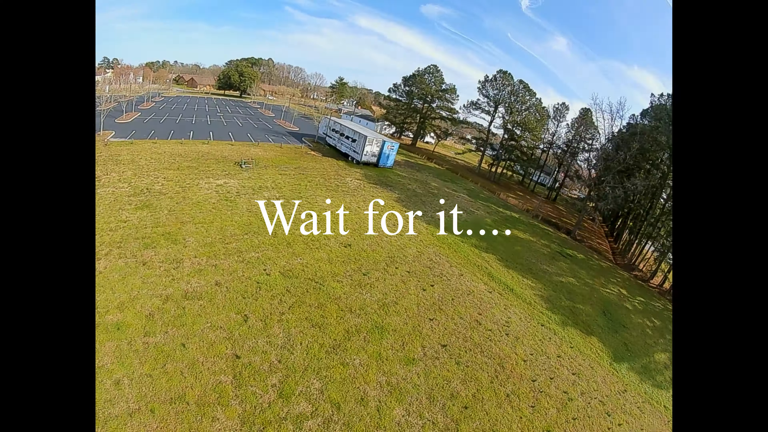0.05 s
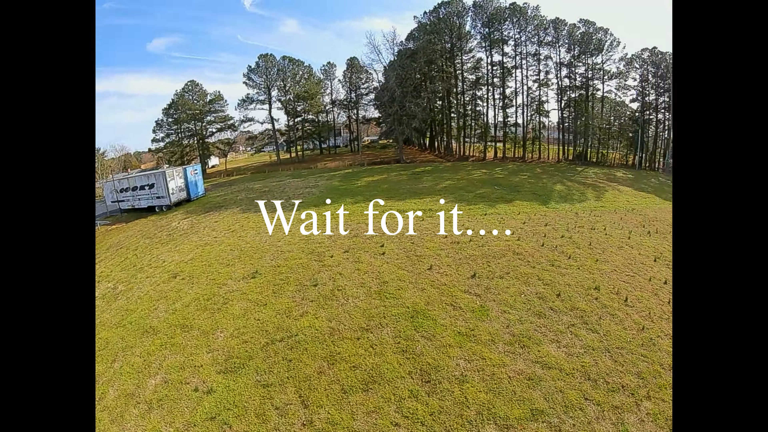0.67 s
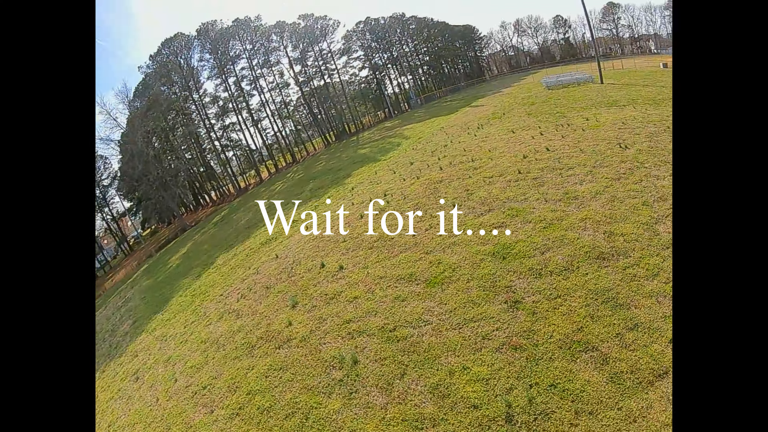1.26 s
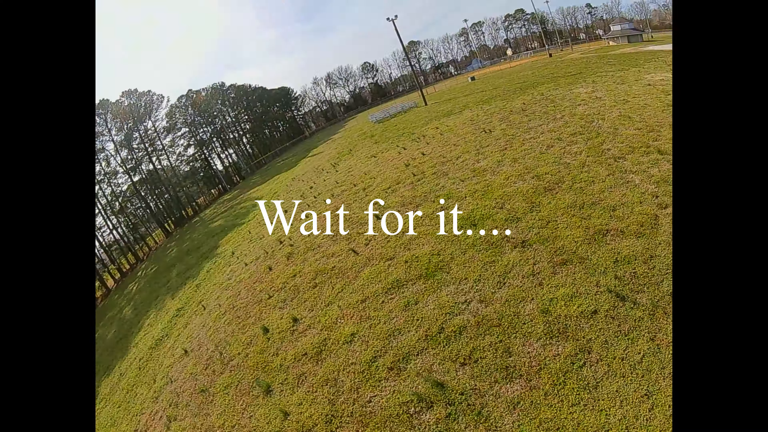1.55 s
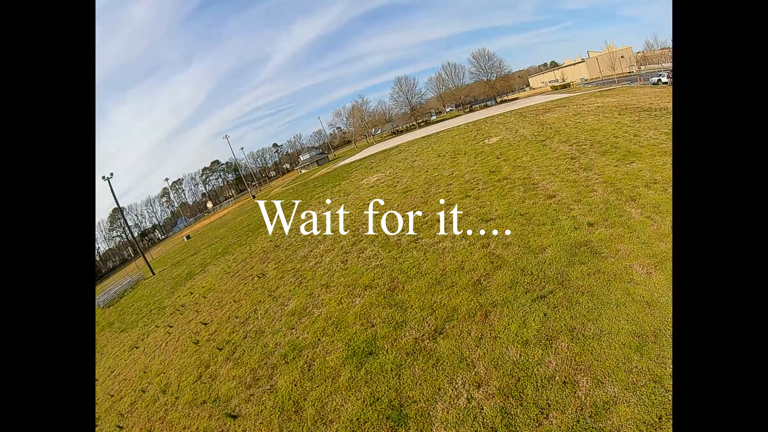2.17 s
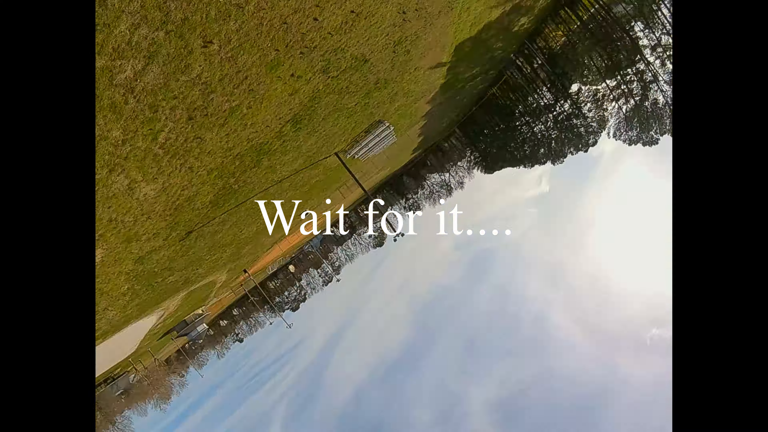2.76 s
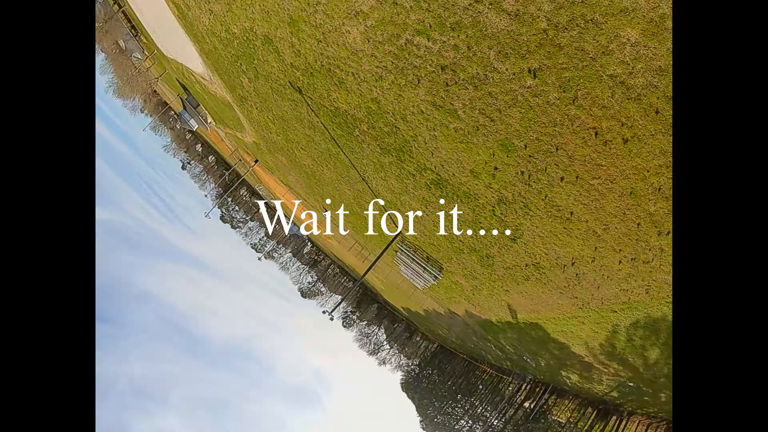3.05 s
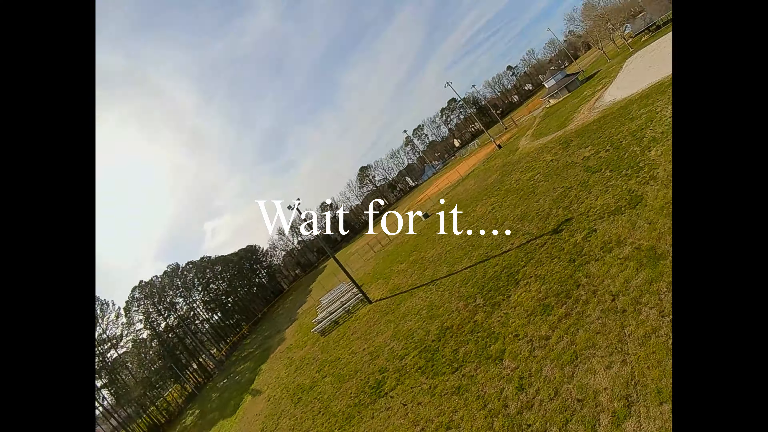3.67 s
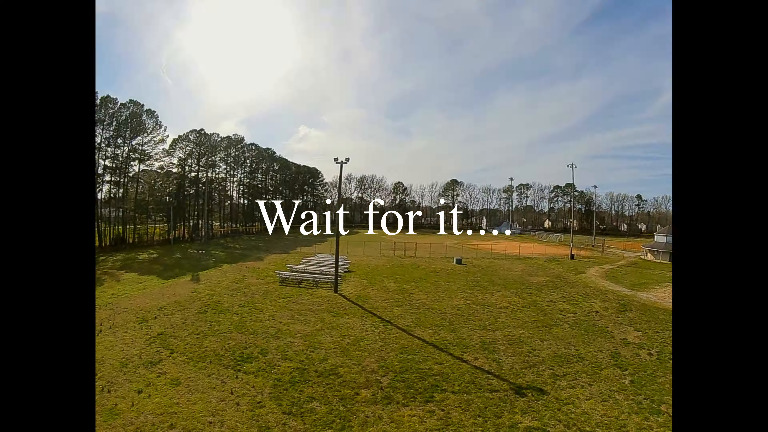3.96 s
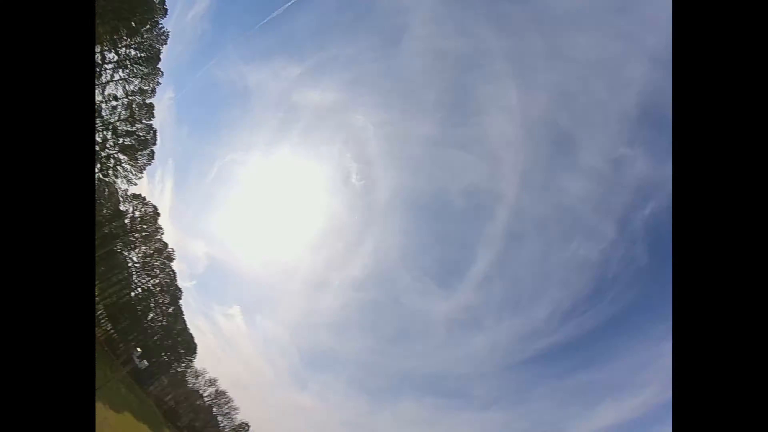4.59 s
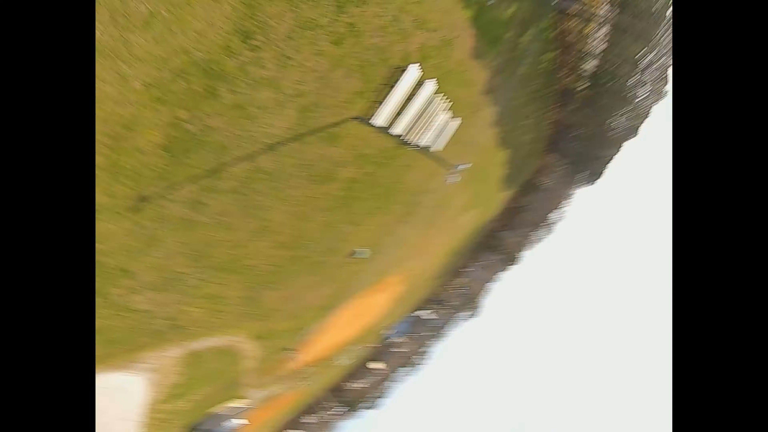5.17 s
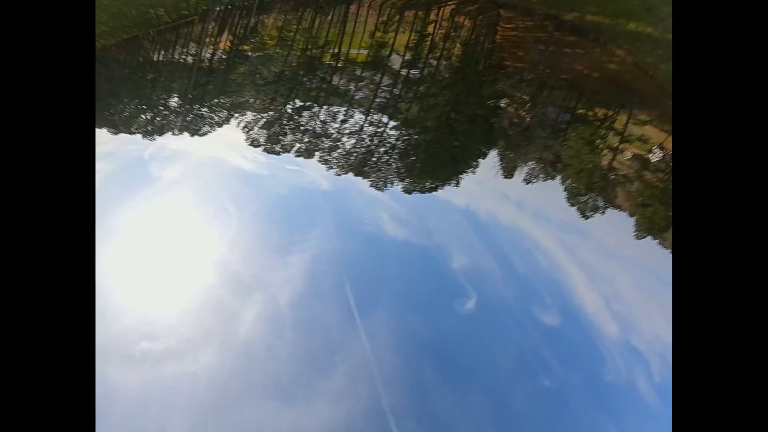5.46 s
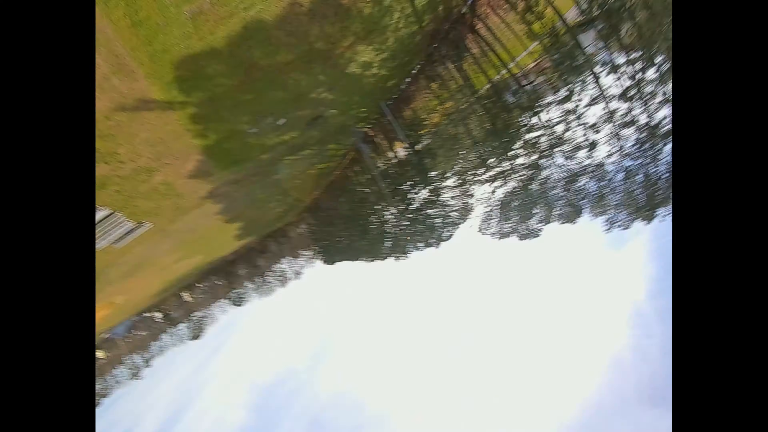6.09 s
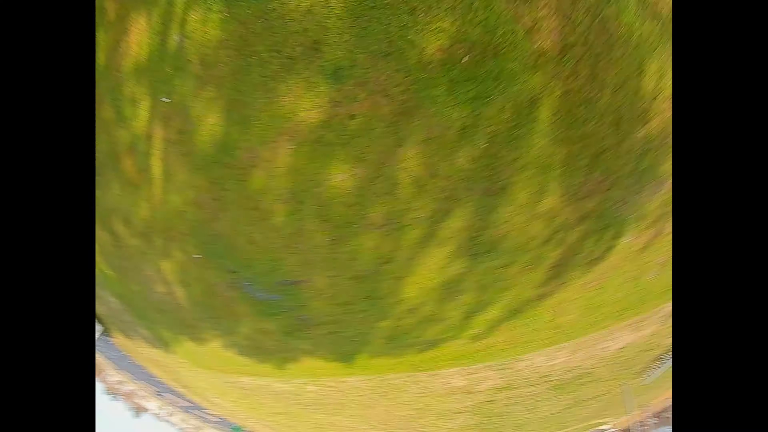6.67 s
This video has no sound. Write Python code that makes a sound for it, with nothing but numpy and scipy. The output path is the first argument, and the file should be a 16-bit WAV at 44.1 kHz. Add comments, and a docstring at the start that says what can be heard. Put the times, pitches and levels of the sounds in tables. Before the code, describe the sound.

A small racing drone whines close to its own on-board microphone in open air, its pitch rising and falling with the throttle over soft wind. It drops briefly to a stuttering idle, then climbs to full power. A propeller snaps with a sharp crack and a loud, distorted buzz. The motors waver, with short rattles, then cut out, leaving a faint whine and wind. All sound is on the left.

```python
"""The rising and falling whine of a racing quadcopter, centimetres from a microphone on its own frame.
Four motors with three-blade propellers follow the throttle in open air. At full power a blade snaps;
the lopsided rotor shakes the frame, overloads the microphone, stalls and rattles in fits. Two motors
see-saw and one fades; then the power is cut and the propellers windmill as the craft tumbles.
Wind rushes behind it all. Only the left channel carries sound."""
import sys
import numpy as np
from scipy.fft import rfft, irfft, next_fast_len
from scipy.io import wavfile
from scipy.ndimage import uniform_filter1d, map_coordinates

SR = 44100
rng = np.random.default_rng(int(sys.argv[2]) if len(sys.argv) > 2 else 0)


def pcm_store(signal):
    """Save signal as 16-bit PCM."""
    levels = np.round(np.clip(np.atleast_2d(signal), -1, 1) * 32767)
    wavfile.write(sys.argv[1], SR, levels.astype(np.int16).T)


N = 301203
T = np.arange(N) / SR
BREAK_S, CUT_S = 4.231, 5.7  # the blade snaps; the power goes off


# Each motor's balance at the microphone (all table levels are relative):
# name -> blade tone/dB, overtones/dB, blade edge/dB, magnet whine/dB
MOTOR_MIX = {"near": (-0.5, -5.5, -0.5, -13.5), "opposite": (-2.5, 3, -9.5, -19),
             "third": (-6, 2, -11.5, -11.5), "doomed": (-8, 0.5, -11, -10.5)}
# Blade tone carried along the frame from the arm nearest the microphone: f/Hz, level/dB
NEAR_ARM = [(250, -72.5), (350, -58), (420, -47.5), (490, -41.5), (560, -51.5), (650, -57), (780, -49.5),
            (950, -43.5), (1150, -41), (1400, -34.5)]
# Blade tone from the three farther arms: f/Hz, level/dB
FAR_ARMS = [(250, -66.5), (400, -54), (480, -41.5), (560, -53), (650, -49), (720, -49), (840, -43),
            (1050, -48.5)]

def motors(near_jitter=0.00612, far_jitter=.011, tumble_jitter=.02,
           sideslip_db=19, wake_db=3, tumble_db=-3.5):
    """Four motors close up: louder in sideslip and in their own wake, weaker and unsteady in the tumble."""
    speeds = shaft_speeds()
    powered = until(CUT_S, 0.083)
    running = {"near": powered, "opposite": powered,
               "third": until(BREAK_S, .19), "doomed": until(BREAK_S, .005)}
    hiss_db = tip_hiss_level(speeds, running)
    tumble = np.clip((T - BREAK_S) / (CUT_S - BREAK_S), 0, 1) ** 2
    wake = sum(bump(s, 2 * width) for s, width, _, _ in WAKE_PUFFS)
    sideslip = curves(TURNING)[0] + curves(BANKING)[0]
    load_db = sideslip_db * sideslip + wake_db * wake + tumble_db * tumble
    sound, shafts = 0, []
    for name, (tone_db, overtone_db, edge_db, whine_db) in MOTOR_MIX.items():
        hz, near = speeds[name], name == "near"
        blade_db = along(NEAR_ARM if near else FAR_ARMS, 3 * hz) + tone_db + load_db
        jitter = (near_jitter if near else far_jitter) + tumble_jitter * tumble
        voice, shaft = rotor(hz, blade_db, overtone_db, edge_db + load_db, whine_db + hiss_db, jitter)
        hum = amp(tumble_db * tumble / 2) * imbalance(hz, shaft) if near else 0
        sound = sound + running[name] * (voice + hum)
        shafts.append(shaft)
    return sound, shafts, hiss_db


# Throttle through a turn, a climb, a roll at idle and full power: t/s, shaft f/Hz
FLIGHT_THROTTLE = [(0, 186.6), (.3, 254.2), (.48, 290), (.68, 214.9), (1.2, 207.6), (1.6, 252.3),
                   (1.82, 232.8), (2.1, 270), (2.43, 357.7), (2.49, 320), (2.56, 171.4), (2.66, 104),
                   (3.03, 87.94), (3.13, 139.4), (3.49, 254), (3.79, 268.1), (4.08, 342), (4.22, 395.6)]
# Throttle after the break, held, eased off and cut: t/s, shaft f/Hz
FALL_THROTTLE = [(4.5, 448.1), (4.6, 442.1), (4.761, 475), (5.24, 442), (5.37, 384.3), (5.68, 245.5),
                 (5.735, 85.3)]
# Steering into the turn: t/s, share of speed taken off a motor with a full part in it
TURNING = [(0, 0.5), (.28, .41), (.48, 0.29), (.65, 0.23), (.95, 0.33), (1.48, .31), (1.66, 0.14), (2, 0)]
# Banking under full power: t/s, share of speed taken off likewise
BANKING = [(3.3, 0.015), (3.5, 0.084), (3.75, 0.2), (4.02, .33), (4.22, 0.32), (4.4, 0.0027)]
# Each motor's steering: name -> trim/share of speed, part in the turn, part in the bank
STEERING_PARTS = {"near": (0, 1, 0), "opposite": (0, 0, 1), "third": (-.025, .25, .7),
                  "doomed": (.02, .05, .25)}
# The crippled craft wobbles: t/s, near motor's dip/share, opposite surge's lead/s, surge width/s
SEE_SAW = [(4.416, 0.075, 0.013, .02), (4.652, 0.16, 0.076, .07), (4.852, 0.26, .02, .025),
           (5.01, .18, 0.0083, .025), (5.149, .17, 0.012, .022), (5.294, 0.14, 0.032, .025),
           (5.45, 0.056, 0.0018, .12)]

def shaft_speeds(dip_s=0.022, low_hz=161.3, surge_hz=101.5):
    """Each motor follows the throttle less its part in the steering; after the break two see-saw."""
    throttle, = curves(FLIGHT_THROTTLE + FALL_THROTTLE)
    turn, bank = curves(TURNING)[0], curves(BANKING)[0]
    hz = {name: throttle * (1 + trim - in_turn * turn - in_bank * bank)
          for name, (trim, in_turn, in_bank) in STEERING_PARTS.items()}
    dips = sum(depth * bump(s, dip_s) for s, depth, _, _ in SEE_SAW)
    surges = sum(bump(s - lead, width) for s, _, lead, width in SEE_SAW)
    hunting = np.minimum(low_hz + surge_hz * np.minimum(surges, 1), throttle)
    intact = until(BREAK_S, .15)
    hz["near"] = hz["near"] * (1 - dips)
    hz["opposite"] = intact * hz["opposite"] + (1 - intact) * hunting
    return hz


# Throttle closed, the controller steadies the craft in jerks: t/s, strength
IDLE_JERKS = [(2.5, 0.013), (2.6, .2), (3.02, 0.22), (3.14, 0.0028), (5.68, 0.0021), (5.72, 0.16)]
# Overtones of unequal blades: shaft order, level/dB
UNEQUAL_BLADES = [(1,-20),(2,-22.5),(4,-19),(5,-19.5),(7,-32.5),(8,-34.5)]
# Blade-pass harmonics: shaft order, level/dB
EDGE_ORDERS = [(6,-2),(9,-12),(12,-18.5)]
# Their path along the frame to the microphone: f/Hz, level/dB
EDGE_PATH = [(800, -62.5), (1550, -48), (2100, -50), (2700, -49.5), (3300, -55), (4100, -40.5),
             (5400, -65.5)]
# Magnets passing the stator: shaft order, level/dB
MAGNET_ORDERS = [(21,-13),(24,-39),(42,-2)]
# The coils sing as they brake the rotor: shaft order, level/dB
BRAKE_ORDERS = [(42,-6.5),(84,-11.5)]

def rotor(hz, blade_db, overtone_db, edge_db, whine_db, jitter, flutter_db=1.5, braking_db=-49):
    """One rotor's blade tone, magnet whine and braking coils; the controller keeps nudging its speed."""
    jerks, = curves(IDLE_JERKS)
    speed = uniform_filter1d(hz, size=700) * (1 + jitter * wobble(28) + 0.00423 * wobble(170))
    kick = kicks(rate=15)
    shaft = angle(speed * np.exp(jerks * (3.2 * kick + .7)))  # with no thrust it sags between kicks
    blades = partials(shaft, [(3, 0)])
    overtones = amp(overtone_db + 3.1 * wobble(25)) * partials(shaft, UNEQUAL_BLADES)
    load = amp(blade_db + flutter_db * wobble(40)) * (1 + 0.13 * wobble(350))  # blades cut uneven air
    tip_speed = hz / 400  # faster tips make sharper pulses and a stronger whine
    ragged = shaft + 0.031 * wobble(450)
    edge_orders = [(k, db + along(EDGE_PATH, k * hz)) for k, db in EDGE_ORDERS]
    edge = tip_speed * amp(edge_db + 1.9 * wobble(70)) * partials(ragged, edge_orders)
    whine_gain = np.sqrt(tip_speed) * amp(whine_db + 2.0 * wobble(30))
    whine = whine_gain * partials(shaft + 0.019 * wobble(450), MAGNET_ORDERS)
    braking_gain = jerks * amp(braking_db + 2.3 * kick + 3.6 * wobble(40))
    braking = braking_gain * partials(shaft + .005 * wobble(600), BRAKE_ORDERS)
    return load * (blades + overtones) + edge + whine + braking, shaft


def kicks(rate):
    """The controller's nudges, an uneven sawtooth: a kick up to 0, then a sag to -1."""
    count = np.cumsum(rate * np.exp(.6 * wobble(12))) / SR + rng.random()
    return uniform_filter1d(-(count % 1), size=400)


# Hum of the arm beside the microphone: shaft f/Hz, once-a-turn level/dB, twice-a-turn level/dB
ARM_HUM = [(120, -69.5, -83), (205, -52.5, -55), (267.9, -48, -55), (334, -37.5, -44.5),
           (381.7, -29.5, -38.5), (402, -29, -48), (426, -39.5, -59), (475, -29.5, -69)]

def imbalance(hz, shaft):
    """A slight imbalance shakes the near arm, most at its critical speed."""
    speeds, once_db, twice_db = np.transpose(ARM_HUM)
    once = amp(np.interp(hz, speeds, once_db) + 3.2 * wobble(25)) * np.sin(shaft)
    twice = amp(np.interp(hz, speeds, twice_db) + 2.3 * wobble(25)) * np.sin(2 * shaft)
    return np.sqrt(2) * (once + twice)


# The motor with the broken propeller, felt straight through the mount: t/s, shaft f/Hz
BROKEN_SPEED = [(4.23, 331), (4.245, 282.7), (4.32, 326), (4.345, 289), (4.366, 281), (4.43, 130.5)]

def broken_propeller(shake_db=-0.5, crack_db=-3, chatter_db=-19, tick_db=-28, twice_db=-15,
                     stall_s=4.364, swing_db_per_s=1300, rattle_db_per_s=420):
    """The blade snaps; the lopsided rotor shakes the frame, which ticks at each swing, until it stalls."""
    hz, = curves(BROKEN_SPEED)
    shaft = angle(hz * (1 + 0.016 * wobble(120)))
    swing = np.sin(shaft) + amp(twice_db) * np.sin(2 * shaft)
    chatter = amp(chatter_db) * unit(frame(rng.standard_normal(N)))
    contact = (0.26 + np.cos(shaft / 2) ** 10) * amp(1.2 * wobble(300))
    tick_noise = noise([(1000, -11.5), (3500, -14.5), (7200, 0), (10500, -14), (16000, -4.5)])
    ticks = amp(tick_db) * unit(contact * tick_noise)
    age, stalled_s = T - BREAK_S, np.maximum(T - stall_s, 0)
    crack = amp(crack_db - 60 * abs(age) / 0.011) * noise(WASH_COLOUR)
    swing_gain = amp(shake_db - swing_db_per_s * stalled_s)
    rattle_gain = amp(shake_db - rattle_db_per_s * stalled_s)
    return (age > 0) * (swing_gain * swing + rattle_gain * (chatter + ticks) + crack)


# Attempts to restart, an arm away: t/s, nominal width/s, rattle level/dB, judder f/Hz, thud level/dB
RESTART_FITS = [(4.405,0.012,-15.5,131,-36),(4.653,0.0097,-21,128,-35.5),(4.743,0.012,-22,125,-31),(4.904,0.014,-10.5,145,-35),(4.916,0.0088,-16,140,-27),(5.058,0.0083,-30,120,-37)]

def restarts(uneven=0.75, scrape=0.88):
    """The stalled motor judders to and fro, knocking the frame at both ends of each swing."""
    sound = np.zeros(N)
    for s, width, rattle_db, judder_hz, thud_db in RESTART_FITS:
        swell = bump(s, width * np.where(T < s, 0.68, 1.12))  # quick to start, slower to settle
        judder = angle(judder_hz * (1 + 0.046 * wobble(90)))
        knocks = np.cos(judder) ** 81
        rattle = frame(swell * knocks * (1 + uneven * wobble(260) + scrape * rng.standard_normal(N)))
        rattle *= np.linalg.norm(swell) / np.linalg.norm(rattle)
        thud = np.sqrt(swell) * np.cos(judder)
        sound += amp(rattle_db) * rattle + amp(thud_db) * thud
    return sound


# Resonances between the motors and the microphone: f/Hz, bandwidth/Hz, level/dB
FRAME_MODES = [(372,50,19),(680,322,17),(913,87,4.5),(1406,700,-15),(2095,940,-47)]

def frame(x):
    """The carbon frame and its mount ring in modes of alternating sign."""
    def response(f):
        return sum((-1) ** k * amp(db) * 1j * f * width / (hz * hz - f * f + 1j * f * width)
                   for k, (hz, width, db) in enumerate(FRAME_MODES))
    return filtered(x, response)


# Power off, the airflow turns the propellers: t/s, shaft f/Hz
WINDMILL_SPEED = [(5.73, 125), (5.77, 79.3), (5.83, 65.3), (6.03, 58), (6.2, 98.4), (6.5, 150.9),
                  (6.83, 173)]
# Each rotor takes up the wind differently: share of speed gained, level/dB
WIND_UPTAKE = [(-.23, -5), (-.07, -4), (0, -4.5), (.07, -2.5)]
# Whine of an unpowered motor: shaft order, level/dB
COAST_ORDERS = [(18,-15),(24,-3.5),(42,-6.5),(48,-25)]
# An arm swings through the wind close to the microphone: t/s, level/dB
ARM_WHISTLES = [(5.78,-56.5),(5.94,-75),(6.21,-53),(6.43,-57.5)]

def windmilling(whine_db=-73.5, db_per_octave=1, coast_db=11.5, settle_s=0.15):
    """The propellers coast down, then speed up in the fall; the tumbling arms whistle."""
    hz = uniform_filter1d(curves(WINDMILL_SPEED)[0], size=3000)
    grip = np.clip(hz / 100, 0, 1) ** 3  # their speeds part as the wind takes hold
    whine = 0
    for gained, db in WIND_UPTAKE:
        speed = hz * (1 + grip * (gained + .012 * wobble(2.5)) + .003 * wobble(12))
        whine += amp(db + 2.6 * wobble(21)) * partials(angle(speed), COAST_ORDERS)
    swings = sum(amp(db) * bump(s, .026) for s, db in ARM_WHISTLES)
    whistle = swings * noise([(1100, -55), (1380, 14), (1580, 12), (1950, -44)])
    after_cut_db = coast_db * np.exp(-np.maximum(T - CUT_S, 0) / settle_s)
    gain = amp(whine_db + db_per_octave * np.log2(hz / 100) + after_cut_db)
    return gain * whine * (1 - until(CUT_S, 0.02)) + whistle


# Turbulent wash around the frame: t/s, level/dB
WASH_LEVEL = [(0, -53), (1.42, -50), (1.87, -56.5), (2.4, -52), (2.95, -57.5), (3.44, -53), (4.17, -42),
              (4.87, -40), (5.67, -51.5), (5.8, -58.5), (6.83, -61)]
# Spectrum of the wash: f/Hz, level/dB
WASH_COLOUR = [(60,-45),(200,-2.5),(450,2),(850,3),(1400,0),(2200,-7),(3200,-22),(5000,-23.5),(9000,-33.5)]
# Spectrum of the blade-tip hiss at close range: f/Hz, level/dB
HISS_COLOUR = [(1760, 4), (3000, 1.5), (3220, 1.5), (5180, -9.5), (6710, 3.5), (8050, -3), (8880, 2),
               (10500, -2.5), (11400, -6), (13000, 4), (15100, -7.5), (16000, -2.5)]
# The propellers bite into their own wake: t/s, width/s, wash level/dB, hiss level/dB
WAKE_PUFFS = [(0.406, 0.13, -48.5, -70), (2.555, 0.049, -53.5, -61), (2.735, 0.017, -45.5, -49.5),
              (4.91, .012, -35.5, -35.5), (5.695, 0.012, -45, -46.5)]
# Wind right on the microphone: t/s, level/dB
BUFFET_LEVEL = [(0, -57), (1.29, -50.5), (1.7, -81), (2.3, -93), (2.55, -60), (3.4, -77), (4.3, -51),
                (5, -51.5), (6.83, -55)]
# Spectrum of its rumble: f/Hz, level/dB
BUFFET_COLOUR = [(15,3),(35,-3.5),(100,-1.5),(200,-7.5),(500,-15),(2000,-84)]

def airflow(hiss_db, shafts, chop=0.088):
    """Turbulence pulses with each passing blade and swells in puffs; wind buffets the microphone."""
    pulsing = unit(1 + chop * sum(np.sin(3 * shaft) for shaft in shafts))
    wash_puffs = sum(amp(db) * bump(s, width) for s, width, db, _ in WAKE_PUFFS)
    hiss_puffs = sum(amp(db) * bump(s, width) for s, width, _, db in WAKE_PUFFS)
    wash_gain = np.hypot(amp(curves(WASH_LEVEL)[0]), wash_puffs)
    wash = wash_gain * amp(1.3 * wobble(30)) * noise(WASH_COLOUR)
    hiss = np.hypot(amp(hiss_db), hiss_puffs) * amp(1.43 * wobble(45)) * noise(HISS_COLOUR)
    buffet = amp(curves(BUFFET_LEVEL)[0] - 2.0 + 0.9 * wobble(39)) * noise(BUFFET_COLOUR)
    return (wash + hiss) * pulsing + buffet


def tip_hiss_level(speeds, running, db=-50, at_hz=261, db_per_octave=9.5, air_db=-86):
    """Hiss in dB grows with the speed of the blade tips; with the power off only the air is left."""
    power = sum((running[name] * amp(db + db_per_octave * np.log2(hz / at_hz))) ** 2
                for name, hz in speeds.items())
    return 10 * np.log10(power / len(speeds) + amp(air_db) ** 2)


def amp(db):
    """Decibels to gain."""
    return 10 ** (np.asarray(db) / 20)


def unit(x):
    """Scale to rms 1."""
    return x / np.sqrt(np.mean(x ** 2) + 1e-20)


def curves(rows):
    """One value per sample for each column after the time."""
    s, *columns = np.transpose(rows)
    return [np.interp(T, s, column) for column in columns]


def along(points, hz):
    """(f/Hz, level/dB) points read on a log axis."""
    f, db = np.transpose(points)
    return np.interp(np.log(hz + 1), np.log(f), db)


def bump(s, width):
    """A bell of height 1 around time s; width is its standard deviation."""
    return np.exp(-.5 * ((T - s) / width) ** 2)


def until(s, fade):
    """Gain 1 that fades out from time s."""
    return np.clip(1 - (T - s) / fade, 0, 1)


def wobble(rate):
    """A smooth random curve, rate knots a second."""
    grid = np.linspace(0, T[-1], int(T[-1] * rate * 10) + 2)
    knots = rng.standard_normal(int(N * rate / SR) + 4)
    return np.interp(T, grid, map_coordinates(knots, [grid * rate]))


def filtered(x, response):
    """x shaped by a response of frequency."""
    size = next_fast_len(N + SR // 4)
    return irfft(rfft(x, size) * response(np.fft.rfftfreq(size, 1 / SR)), size)[:N]


def noise(spectrum):
    """Noise of rms 1 with the given (f/Hz, level/dB) colour."""
    return unit(filtered(rng.standard_normal(N), lambda hz: amp(along(spectrum, hz))))


def angle(hz):
    """Shaft angle from its speed."""
    return 2 * np.pi * (np.cumsum(hz) / SR + rng.random())


def partials(shaft, orders):
    """Sines locked to the shaft."""
    return np.sqrt(2) * sum(amp(db) * np.sin(round(k) * shaft + rng.uniform(0, 2 * np.pi))
                            for k, db in orders)


def scene():
    """Everything rides on the same frame, close to one microphone on the left channel."""
    drive, shafts, hiss_db = motors()
    mono = drive + airflow(hiss_db, shafts) + broken_propeller() + restarts() + windmilling()
    return np.array([2 * mono, np.zeros(N)])


def record(dry, ceiling=0.78, hardness=5, top_hz=15850):
    """The on-board microphone overloads on the shaking; nothing is kept above the band limit."""
    clipped = dry / (1 + abs(dry / ceiling) ** hardness) ** (1 / hardness)
    return np.array([filtered(side, lambda hz: hz < top_hz) for side in clipped])


dry = scene()
out = record(dry)
pcm_store(out)
```